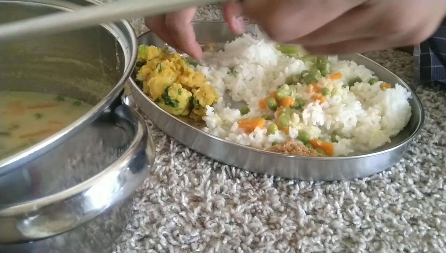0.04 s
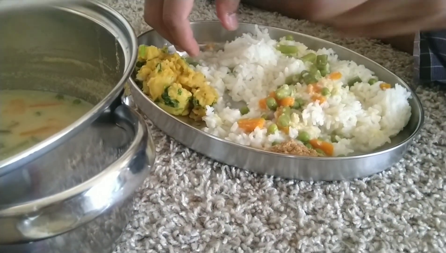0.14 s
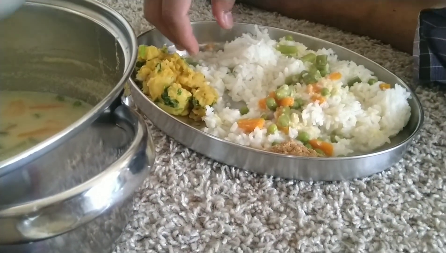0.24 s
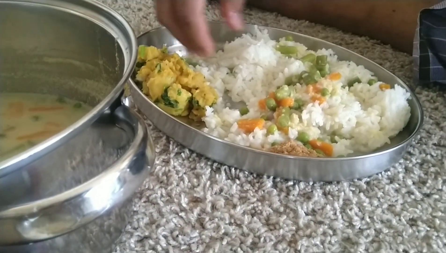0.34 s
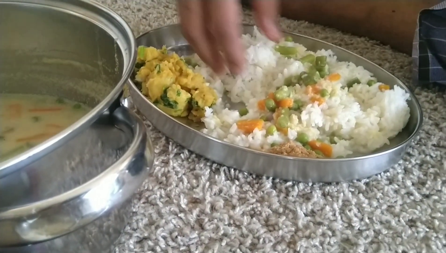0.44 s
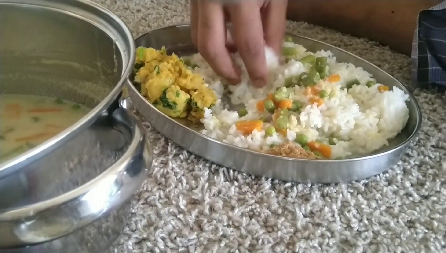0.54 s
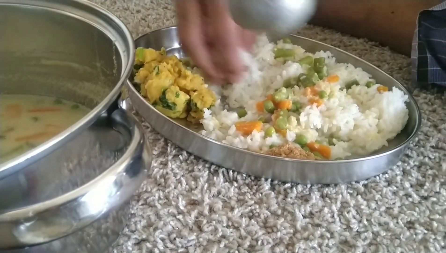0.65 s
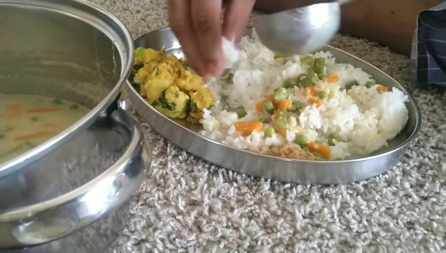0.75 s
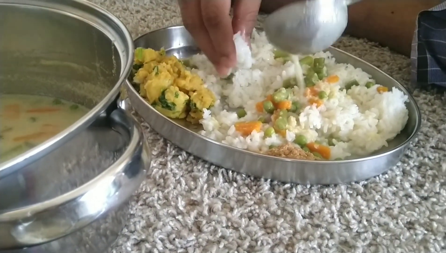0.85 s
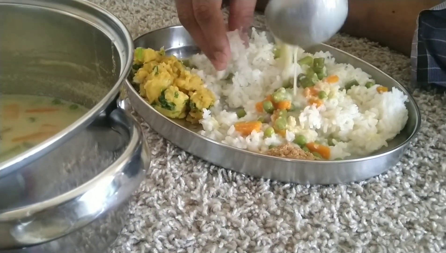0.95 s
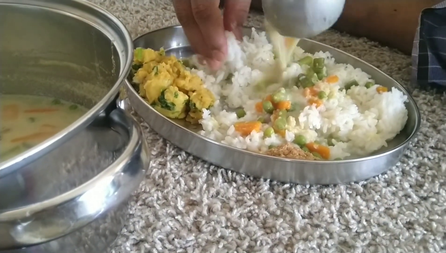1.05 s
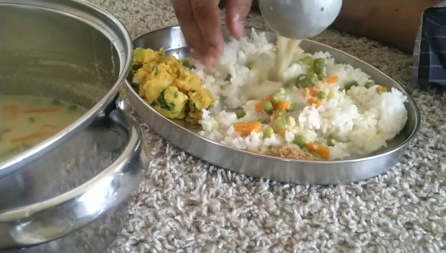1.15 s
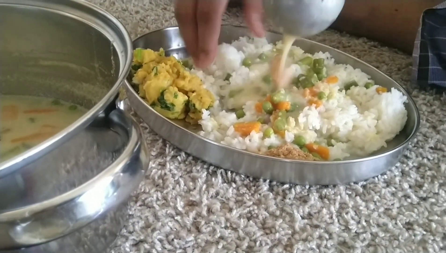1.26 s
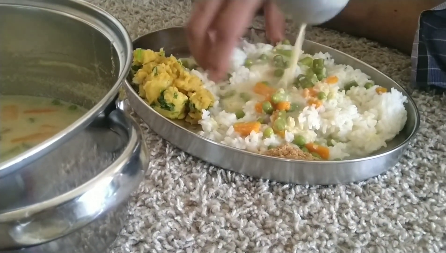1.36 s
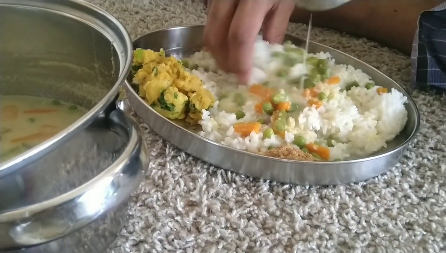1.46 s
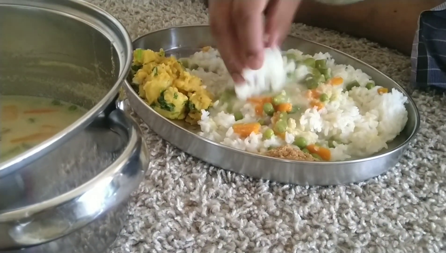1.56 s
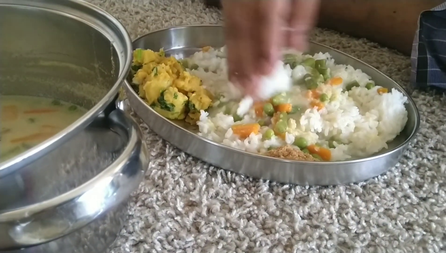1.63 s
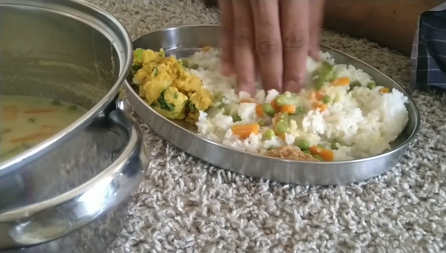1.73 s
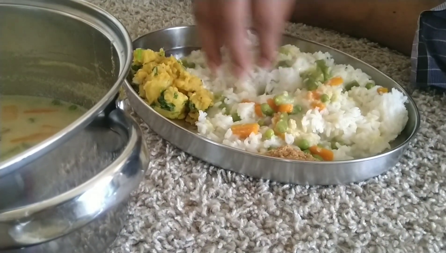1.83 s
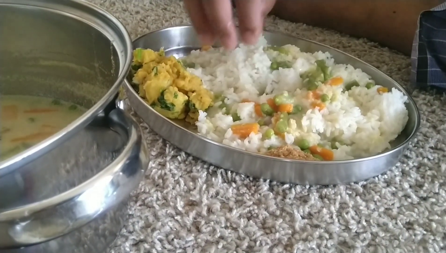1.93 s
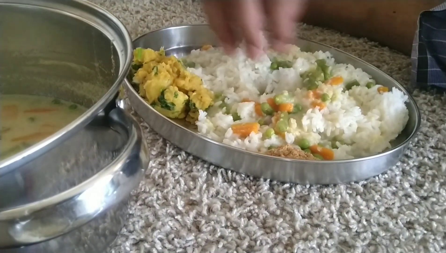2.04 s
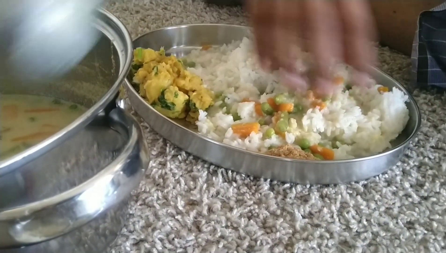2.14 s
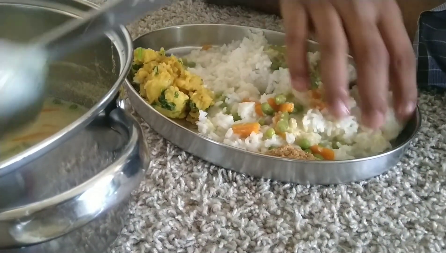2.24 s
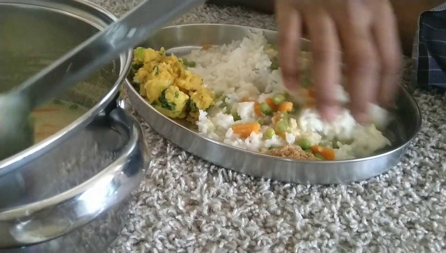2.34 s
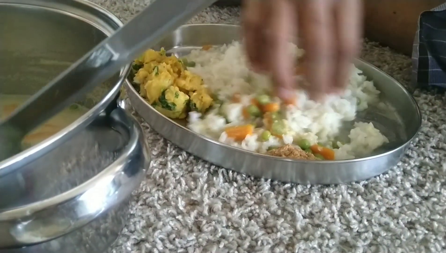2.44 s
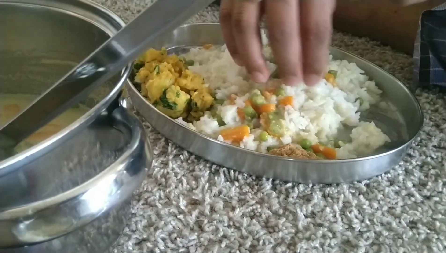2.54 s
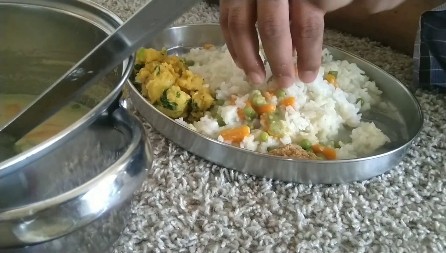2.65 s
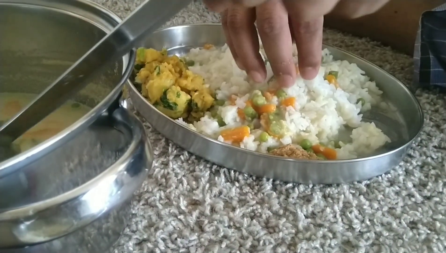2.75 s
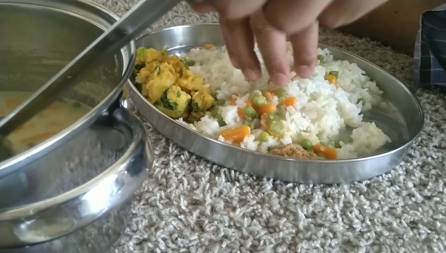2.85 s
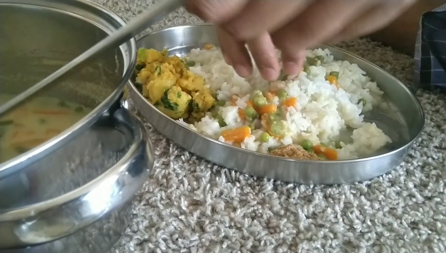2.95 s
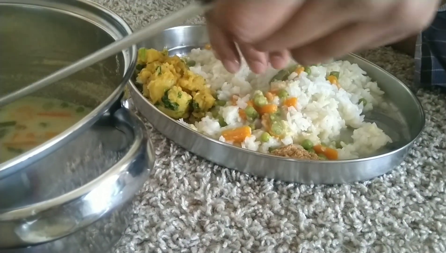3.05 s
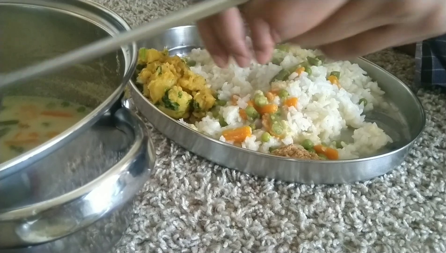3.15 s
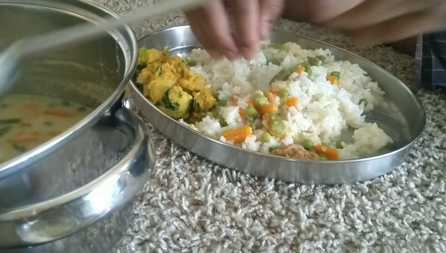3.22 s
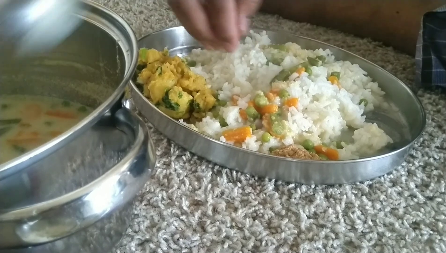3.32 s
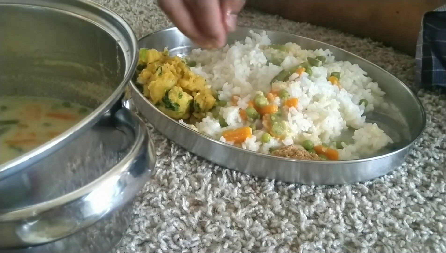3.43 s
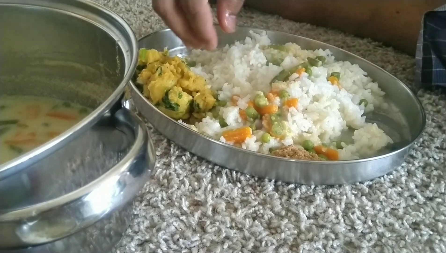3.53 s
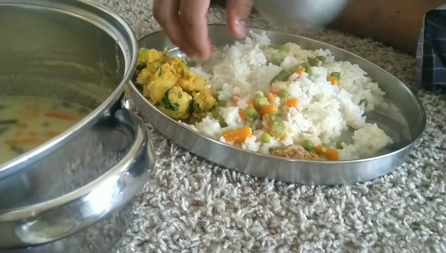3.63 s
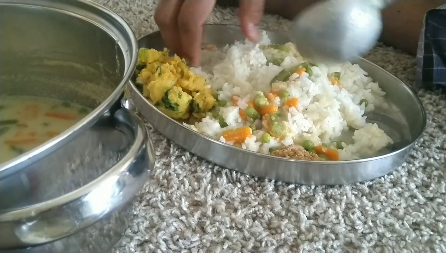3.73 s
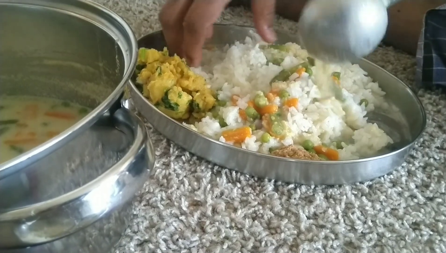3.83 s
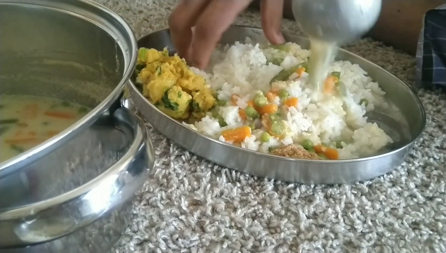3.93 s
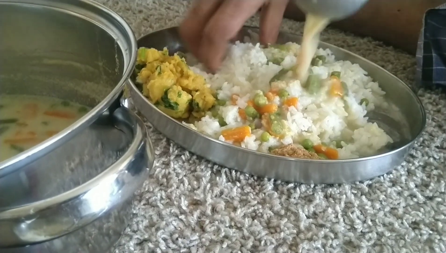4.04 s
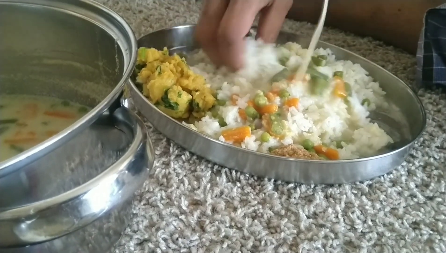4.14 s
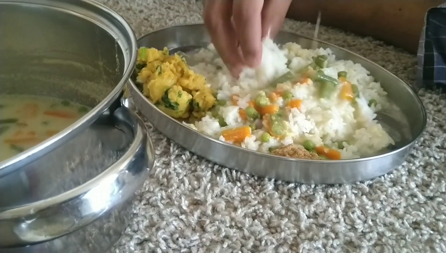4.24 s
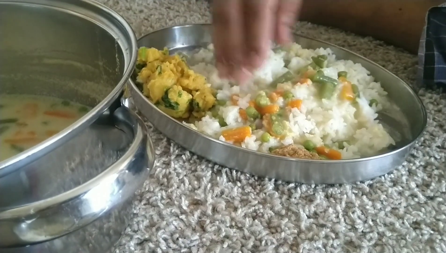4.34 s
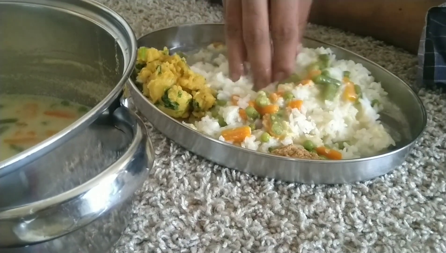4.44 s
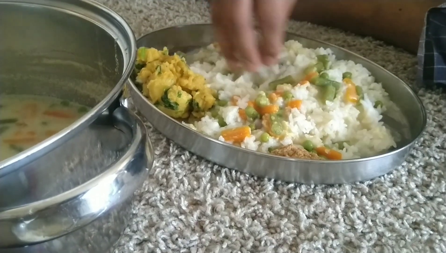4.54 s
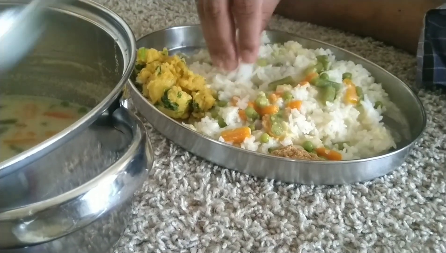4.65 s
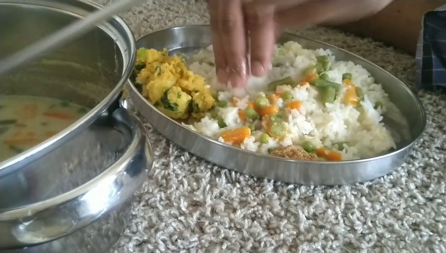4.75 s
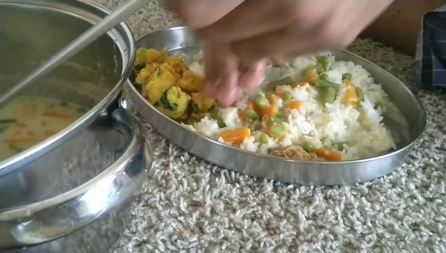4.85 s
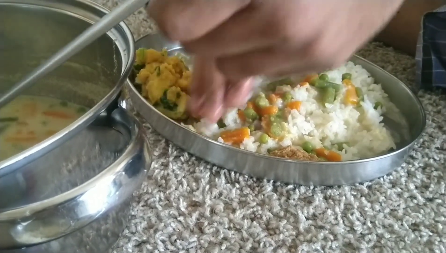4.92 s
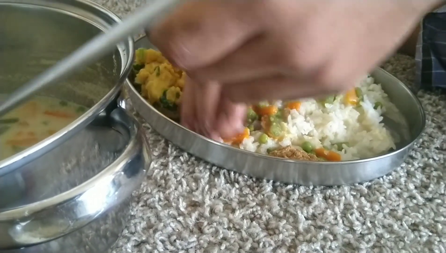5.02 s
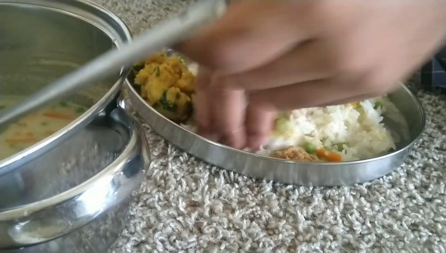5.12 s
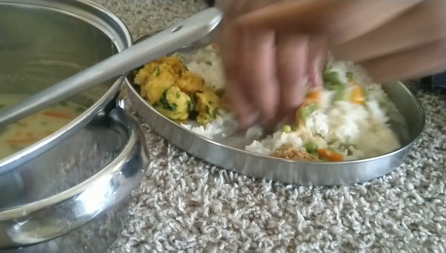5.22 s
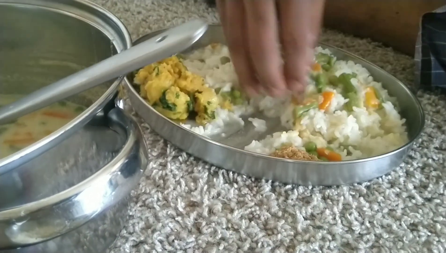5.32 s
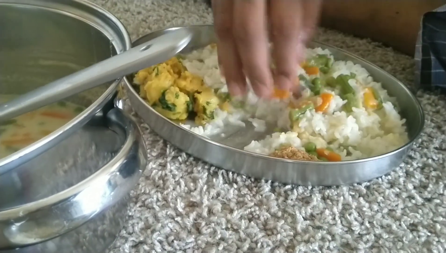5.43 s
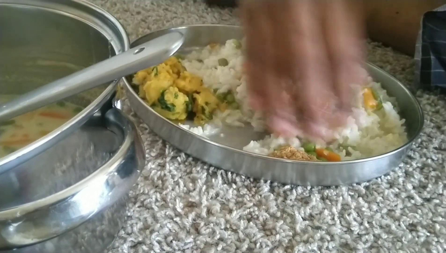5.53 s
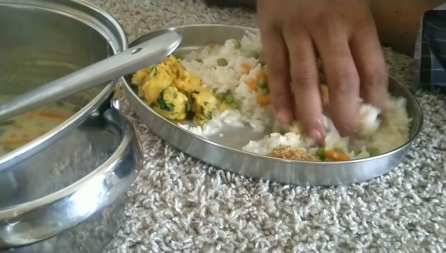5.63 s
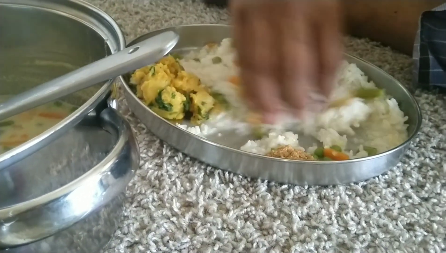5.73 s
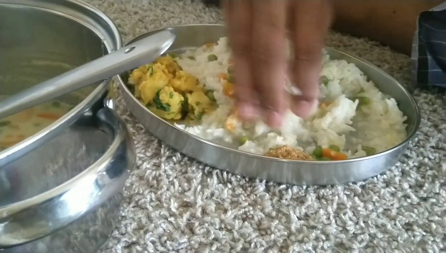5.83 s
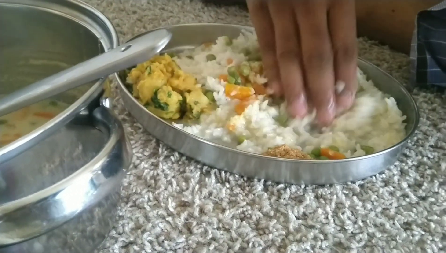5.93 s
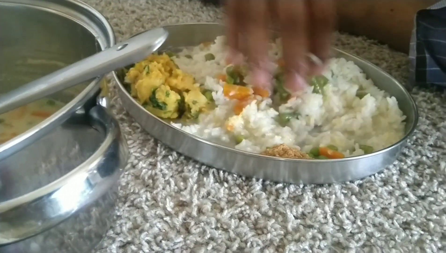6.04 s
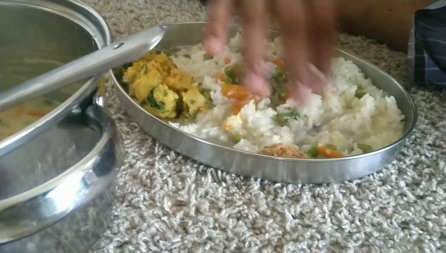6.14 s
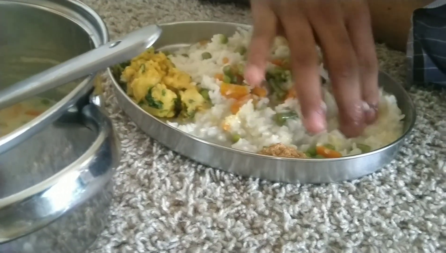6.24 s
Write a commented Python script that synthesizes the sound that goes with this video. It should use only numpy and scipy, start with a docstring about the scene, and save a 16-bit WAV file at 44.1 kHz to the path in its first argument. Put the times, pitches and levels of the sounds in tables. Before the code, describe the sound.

Fingers mix wet rice and stew on a plate, making soft squishes and tiny crackling pops. Midway, a steel ladle knocks against a pot in a quick, damped cluster. More squishing follows, then the ladle is let go and chatters to rest on the rim, louder and brighter. An appliance hums low and steady throughout, and everything sounds close in a small carpeted room.

```python
"""Carpeted room: someone ladles stew from a steel pot onto a plate of rice and mixes it by hand.
The ladle knocks the pot as it dips in; later it is let go and chatters to rest on the rim.
Each contact rings the steel's modes. Air pockets in the wet rice fizz and pop under the fingers.
An appliance hums low and steady behind it."""
import sys
import numpy as np
from scipy import signal
from scipy.fft import rfft, irfft
from scipy.io import wavfile

SR = 44100
rng = np.random.default_rng(int(sys.argv[2]) if len(sys.argv) > 2 else 0)


def unload_wav(signal):
    """Save mono or channel-first audio to the path in sys.argv[1] as 16-bit WAV at rate SR, clipped to [-1, 1]."""
    wavfile.write(
        sys.argv[1],
        SR,
        np.round(np.clip(np.atleast_2d(signal).T, -1, 1) * 32767).astype(np.int16),
    )


N = 276948

# wet rice spectrum: f/Hz, level/dB
SQUISH_SPECTRUM = [(900, -20), (1600, -9), (2400, -5), (3500, -7.5), (5400, 0), (6800, -4.5), (7800, -8.5),
                   (8400, -26)]


def ladle_dip():
    """The held ladle knocks the pot; the hand damps it."""
    # knocks: t/s, level/dB, chatter length/s
    knocks = [(2.6262, -2, 0.007), (2.641, -7.5, 0.0075), (2.668, -13, .03), (2.683, -6.5, 0.027),
              (2.754, -17.5, .012), (2.765, -11, .022), (2.858, -22, 0.0062), (2.874, -23.5, .009)]
    # modes of pot and held ladle: f/Hz, level/dB
    modes = [(654, -9), (770, -2), (823, -8), (932, 0), (1213, -8), (1300, -10), (2429, -15), (2526, -9),
             (2759, -9), (3005, -9), (3432, -14), (4263, -6), (4330, -9), (5228, -10), (5324, -9),
             (5456, -9), (5582, -7), (5764, -8), (5818, -6), (5880, -4), (5951, -7), (6023, -5), (6150, -8),
             (7564, -17)]
    # spectrum of their weak modes: f/Hz, level/dB
    wash = [(250, -9), (450, -7.5), (900, -0.5), (1250, -7), (1550, -15), (2100, -17), (2550, -4),
            (3500, -11), (4400, -7), (5700, -6), (6700, -14.5), (7600, -10.5), (8300, -26.5)]
    return steel(contact_force(knocks), modes, wash,
                 ring_db=-48.5, wash_rel_db=-3.5, clack_rel_db=-6, ring_t60_s=0.2, grip=2.5)


def ladle_drop(rest_s=5.595, choke_db_per_s=190):
    """The free ladle bounces on the rim and rings brighter; lying still, it damps the pot."""
    # bounces: t/s, level/dB, chatter length/s
    bounces = [(5.2775, 0.5, .012), (5.3025, -1, .016), (5.324, -6.5, .009), (5.344, -2, 0.031),
               (5.380, -11, 0.016), (5.422, -8, 0.021), (5.449, -7.5, .031), (5.493, -12, .02),
               (5.529, -14.5, 0.035), (5.566, -18.5, 0.085)]
    # modes of pot and free ladle: f/Hz, level/dB
    modes = [(546, -16), (618, -16), (745, -8), (917, -8), (1301, -18), (1761, -15), (1791, -14), (2430, 0),
             (2459, -6), (2502, -10), (2659, -14), (2987, -11), (3230, -9), (3565, -16), (3776, -15),
             (3929, -15), (4081, -9), (4205, -11), (4425, -14), (4667, -14), (5015, -6), (5062, -5),
             (5267, -14), (5435, -17), (5515, -12), (5735, -7), (5868, -16), (5986, -13), (7447, -17),
             (7590, -10)]
    # spectrum of their weak modes: f/Hz, level/dB
    wash = [(250, -28), (450, -15.5), (900, -7), (1250, -10.5), (1550, -7.5), (2100, -16), (2550, -3),
            (3500, -5), (4400, -7), (5700, -4.5), (6700, -8), (7600, -6), (8300, -27.5)]
    ringing = steel(contact_force(bounces), modes, wash,
                    ring_db=-35.5, wash_rel_db=-5, clack_rel_db=-5.5, ring_t60_s=0.16, grip=1)
    resting_s = np.maximum(np.arange(N) / SR - rest_s, 0)
    return ringing * amp(-choke_db_per_s * resting_s)


def contact_force(landings, blow_db=-1.5, chatter_db=-1.5, glance_db_per_s=199, rebounds_per_s=800):
    """Steel on steel: a blow, then a buzz of uneven rebounds. Longer chatter, more glancing blow."""
    force = np.zeros(N)
    slot = SR // rebounds_per_s
    t = np.arange(SR // 10 // slot * slot) / SR
    for start_s, db, length_s in landings:
        chance = rng.random(len(t)).reshape(-1, slot)
        touching = (chance == chance.max(1, keepdims=True)).ravel()  # one rebound per slot
        sizes = np.tanh(2 * rng.standard_normal(len(t)))
        buzz = touching * sizes * np.exp(-(t / length_s) ** 4)
        add(force, start_s, amp([db + blow_db - glance_db_per_s * length_s]))
        add(force, start_s, amp(db + chatter_db) * buzz / (np.linalg.norm(buzz) + 1e-9))
    return force


def steel(force, modes, wash, ring_db, wash_rel_db, clack_rel_db, ring_t60_s, grip):
    """Strong modes, damped by the stew, over a dry clack and a dense clatter of weak modes."""
    grip_t60_s, clack_t60_s, wash_t60_s, onset_s = 0.011, 0.021, 0.17, 0.00042
    t = np.arange(SR // 2) / SR
    attack = 1 - np.exp(-t / onset_s)  # bending wave spreads
    ring = np.zeros(N)
    for hz, db in modes:
        t60_s = ring_t60_s * (2500 / hz) ** 0.41
        # fast drop while the parts grip, then free ringing
        decay = grip * amp(-60 * t / grip_t60_s) + amp(-60 * t / t60_s)
        tone = np.sin(2 * np.pi * (hz * t + rng.random()))
        mode = signal.oaconvolve(force, tone * attack * decay)[:N]
        ring += amp(db) * mode / np.linalg.norm(mode)
    burst = coloured(rng.standard_normal(len(t)), wash) * attack * amp(-60 * t / clack_t60_s)
    clack = signal.oaconvolve(force, burst)[:N]
    # each contact stirs different weak modes, so powers add
    power = signal.oaconvolve(force ** 2, (attack * amp(-60 * t / wash_t60_s)) ** 2)[:N]
    clatter = np.sqrt(np.maximum(power, 0)) * coloured(rng.standard_normal(N), wash)
    noise = amp(clack_rel_db) * unit_rms(clack) + amp(wash_rel_db) * unit_rms(clatter)
    return amp(ring_db) * (unit_rms(ring) + noise)


def rice(fizz_db=-1):
    """Single air pockets pop above a fizz and a crackle that both follow the pressure."""
    # loudest pockets: t/s, level/dB, f/Hz
    pockets = [(0.5909, -39.5, 6260), (0.665, -41, 6160), (0.7337, -33, 6100), (1.1674, -38, 4940),
               (1.2216, -25.5, 3810), (1.2521, -30, 5400), (1.297, -39.5, 1175), (1.3895, -33.5, 5240),
               (1.391, -34, 2950), (1.461, -46.5, 1990), (1.5032, -33, 4850), (1.5962, -37, 4330),
               (1.605, -38.5, 2960), (1.6433, -37, 7330), (2.4672, -32.5, 5700), (2.493, -30.5, 4700),
               (2.573, -44.5, 3500), (3.9482, -32, 5050), (4.0296, -36.5, 4850), (4.0653, -36, 3100),
               (4.1044, -34.5, 5250), (4.2274, -24, 5540), (4.251, -40, 2980), (4.3532, -37.5, 4200),
               (4.522, -32.5, 5570), (5.7298, -35.5, 5460), (5.824, -38, 6600), (6.0676, -34.5, 5130)]
    pops = np.zeros(N)
    for start_s, db, hz in pockets:
        add(pops, start_s, amp(db) * pop(hz))
    pressed = pressure()
    return pops + amp(fizz_db) * pressed * fizz() + crackle(pressed)


def pressure(swell_db=14.5, roundness=1.6):
    """Fingers and falling stew press the rice; each squeeze builds and lets go."""
    # squeezes: peak t/s, level/dB, build-up/s, release/s
    squeezes = [(.75, -55, 0.068, 0.047), (1.23, -56.5, 0.19, .15), (1.6, -53, 0.18, 0.11),
                (1.86, -61, 0.32, 0.24), (2.49, -57.5, .14, .13), (3.989, -58.5, 0.15, 0.27),
                (4.235, -55.5, 0.19, .2), (4.59, -61, 0.16, 0.29), (5.76, -56, 0.13, 0.15),
                (6.04, -58.5, 0.11, 0.088)]
    t = np.arange(N) / SR
    power = np.zeros(N)
    for peak_s, db, build_s, release_s in squeezes:
        from_peak = np.maximum((peak_s - t) / build_s, (t - peak_s) / release_s)
        power += amp(db - swell_db * from_peak ** roundness) ** 2
    return np.sqrt(power)


def pop(hz, decay_cycles=4, snap_db=-6.5, snap_s=0.0003):
    """The film snaps, then the pocket rings."""
    tone = bubble(hz, decay_s=decay_cycles / hz, climb=0.071, onset_s=0.00063)
    t = np.arange(len(tone)) / SR
    snap = rng.standard_normal(len(t)) * np.exp(-t / snap_s)
    return tone + amp(snap_db) * snap


def bubble(hz, decay_s, climb, onset_s):
    """A brief tone that climbs as the air pocket opens."""
    t = np.arange(SR // 60) / SR
    pitch_hz = hz * (1 + climb * np.minimum(t / decay_s, 4) - climb)
    envelope = (1 - np.exp(-t / onset_s)) * np.exp(-t / decay_s)
    return np.sin(2 * np.pi * np.cumsum(pitch_hz) / SR) * envelope / envelope.max()


def crackle(pressed, pops_per_s=60, gain_db=13.5, spread_db=3, centre_hz=5350, spread_oct=0.19):
    """Mid-sized pops at random times, scaled by the pressure."""
    out = np.zeros(N)
    count = round(pops_per_s * N / SR)
    starts = rng.integers(0, N, count)
    scatter = np.clip(rng.standard_normal((count, 2)), -2, 2)
    for start, (size, detune) in zip(starts, scatter):
        sound = pop(centre_hz * 2 ** (spread_oct * detune))
        add(out, start / SR, pressed[start] * amp(gain_db + spread_db * size) * sound)
    return coloured(out, SQUISH_SPECTRUM)


def fizz(bubbles_per_s=2400, spread_db=2.9):
    """A steady random stream of tiny bursting bubbles."""
    out = np.zeros(N)
    pitches_hz = np.geomspace(1400, 8000, 32)
    for hz in pitches_hz:
        sizes = amp(spread_db * np.minimum(rng.exponential(1, N), 4))
        bursts = rng.random(N) < bubbles_per_s / len(pitches_hz) / SR
        grain = bubble(hz, decay_s=4.5 / hz, climb=0.02, onset_s=3 / hz)
        out += signal.oaconvolve(sizes * bursts, hz * grain)[:N]
    return unit_rms(coloured(out, SQUISH_SPECTRUM))


def room(x, wet_db=-11, t60_s=0.13, echoes_per_s=3000, predelay_s=0.002):
    """Adds the short, soft reflections of a carpeted room."""
    t = np.arange(SR // 3) / SR
    taps = rng.standard_normal(len(t)) * amp(-60 * t / t60_s)
    taps *= (rng.random(len(t)) < echoes_per_s / SR) & (t > predelay_s)
    return x + amp(wet_db) * signal.oaconvolve(x, taps / np.linalg.norm(taps))[:N]


def appliance(rumble_db=-37, hiss_db=-50.5):
    """Rumble, wavering motor hum and duct tones, with the room's airy hiss."""
    # appliance rumble spectrum: f/Hz, level/dB
    rumble = [(15, -34), (40, -27.5), (52, -27), (72, -5.5), (108, -1.5), (140, -5), (168, -7.5),
              (182, -16.5), (215, -11.5), (275, -15.5), (340, -22.5), (430, -18), (520, -34.5),
              (900, -72.5)]
    # room hiss spectrum: f/Hz, level/dB
    hiss = [(300, -4), (600, 4), (850, 2.5), (1030, -6), (1350, -8), (1700, -15.5), (2300, -18),
            (3000, -21), (3600, -25.5), (4500, -23), (5500, -20), (6800, -28), (7600, -30.5), (8300, -48.5)]
    # motor hum and duct resonances: f/Hz, half-width/Hz, rms level/dB
    hum_lines = [(28, 2, -63.5), (114.07, 5.1, -41.5), (119.34, 2.6, -40), (137.4, 2.6, -45),
                 (240.2, 4.4, -66.5), (297, 2.6, -57.5), (879, 18, -60.5), (909, 8.4, -55),
                 (944.6, 9.1, -59)]
    hz = np.fft.rfftfreq(N, 1 / SR)
    out = amp(rumble_db) * unit_rms(coloured(rng.standard_normal(N), rumble))
    out += amp(hiss_db) * unit_rms(coloured(rng.standard_normal(N), hiss))
    for centre_hz, half_width_hz, db in hum_lines:
        resonance = 1 / (1 + ((hz - centre_hz) / half_width_hz) ** 2)
        out += amp(db) * unit_rms(irfft(rfft(rng.standard_normal(N)) * resonance, N))
    return out


def amp(db):
    """dB to gain."""
    return 10 ** (np.asarray(db) / 20)


def unit_rms(x):
    """Scales to rms 1."""
    return x / np.sqrt(np.mean(x ** 2) + 1e-20)


def gain_at(spectrum, hz):
    """Gain of a spectrum table, interpolated over log frequency."""
    table_hz, db = np.transpose(spectrum)
    return amp(np.interp(np.log(hz + 1), np.log(table_hz + 1), db))


def coloured(x, spectrum):
    """Filters x by a spectrum table."""
    hz = np.fft.rfftfreq(len(x), 1 / SR)
    return irfft(rfft(x) * gain_at(spectrum, hz), len(x))


def add(mix, start_s, sound):
    """Mixes a sound in at start_s."""
    part = mix[round(start_s * SR):][:len(sound)]
    part += sound[:len(part)]


def scene():
    """Left: the full mix. Right: the same, dull and notched."""
    # right channel response: f/Hz, level/dB
    right_response = [(350, 0), (480, -3.5), (780, -5.5), (980, -8.5), (1130, -20), (1260, -11),
                      (1380, -15), (1620, -44), (1850, -28.5), (2200, -22.5), (2650, -36.5), (2950, -72.5),
                      (4000, -84)]
    notches_hz, notch_width_hz = (540, 1110, 1520, 2360), 70
    left = ladle_dip() + ladle_drop() + room(rice()) + appliance()
    hz = np.fft.rfftfreq(N, 1 / SR)
    # sign flips at each notch
    notches = np.prod([np.tanh((notch_hz - hz) / notch_width_hz) for notch_hz in notches_hz], axis=0)
    right = irfft(rfft(left) * notches * gain_at(right_response, hz), N)
    return np.array([left, right])


def record(dry):
    """Low-pass at 8350 Hz."""
    lowpass = signal.firwin(301, 8350, window=("kaiser", 8), fs=SR)
    return signal.oaconvolve(dry, lowpass[None], "same")


dry = scene()
out = record(dry)
unload_wav(out)
```